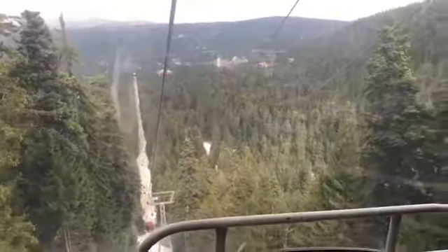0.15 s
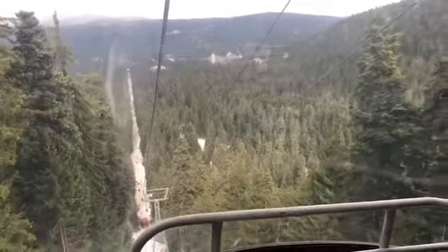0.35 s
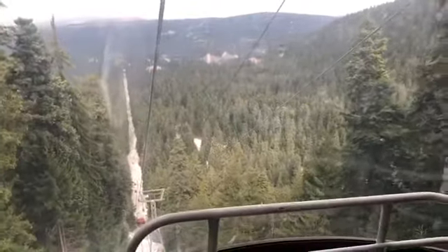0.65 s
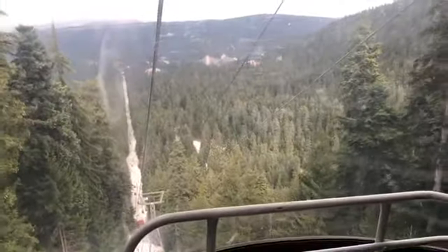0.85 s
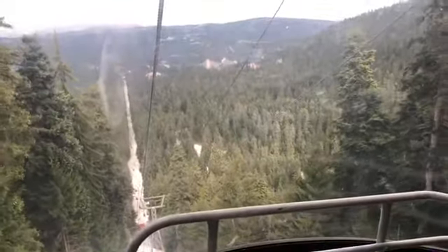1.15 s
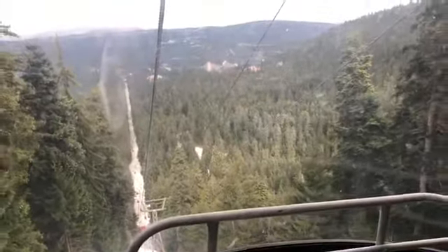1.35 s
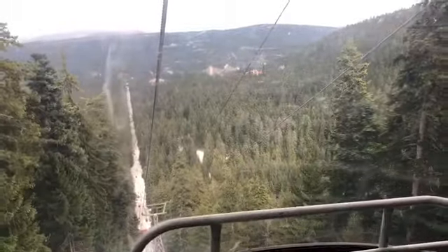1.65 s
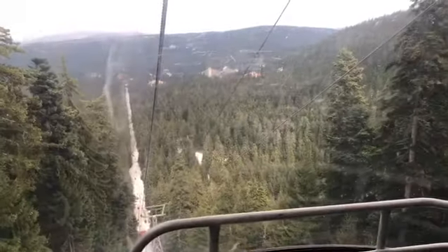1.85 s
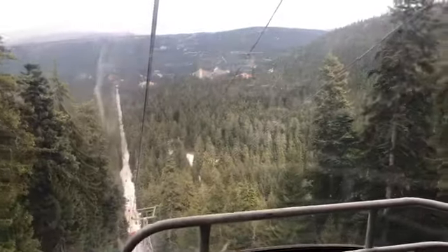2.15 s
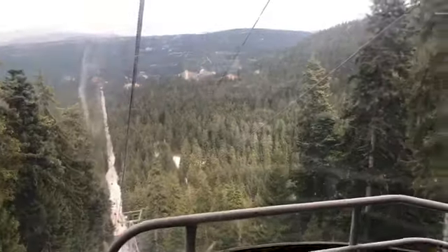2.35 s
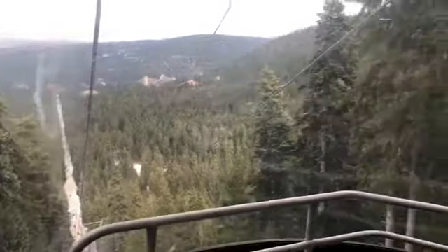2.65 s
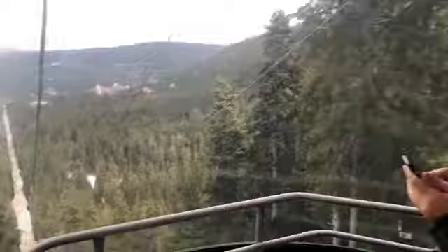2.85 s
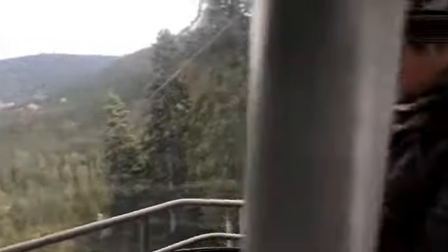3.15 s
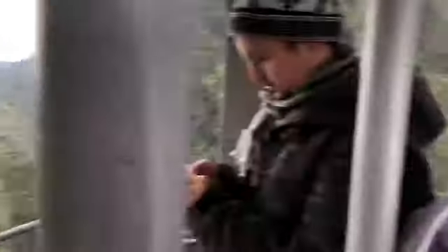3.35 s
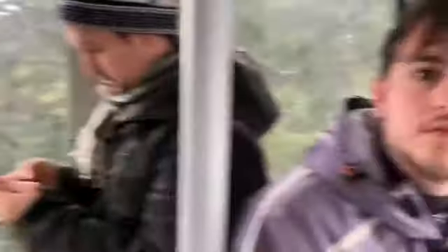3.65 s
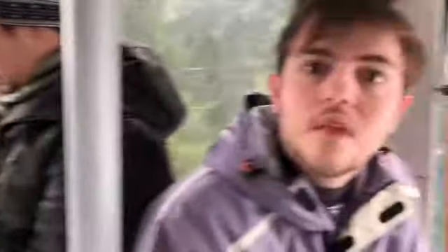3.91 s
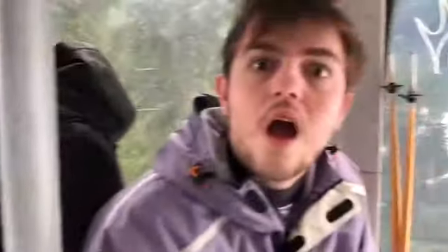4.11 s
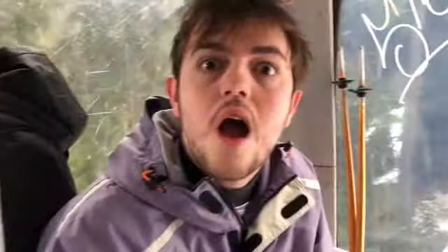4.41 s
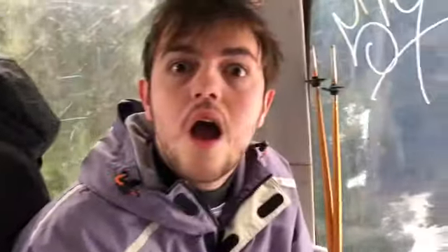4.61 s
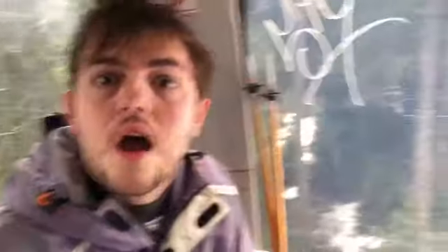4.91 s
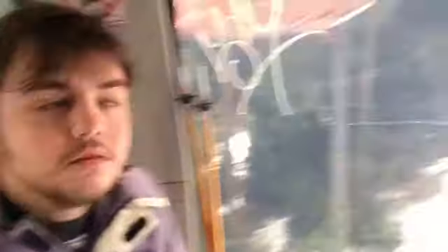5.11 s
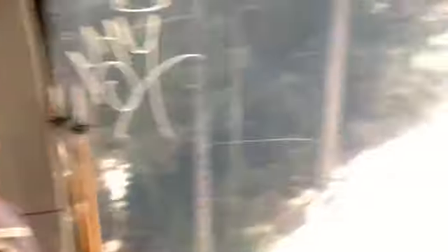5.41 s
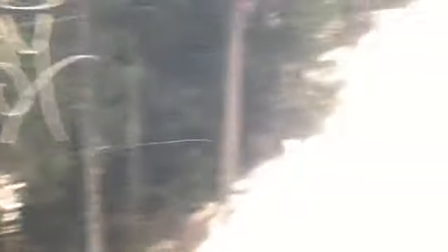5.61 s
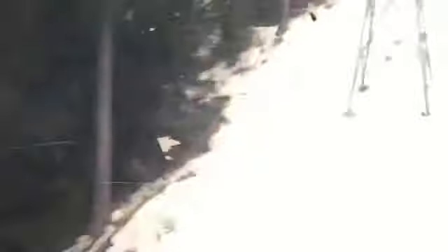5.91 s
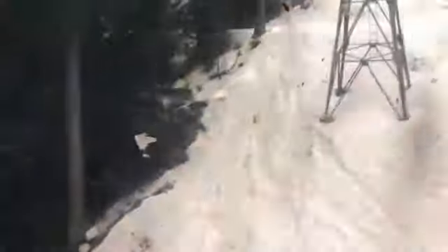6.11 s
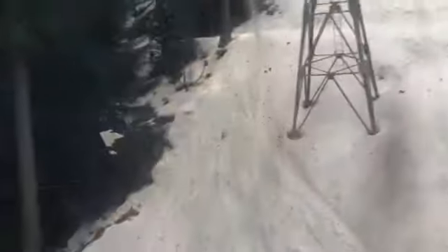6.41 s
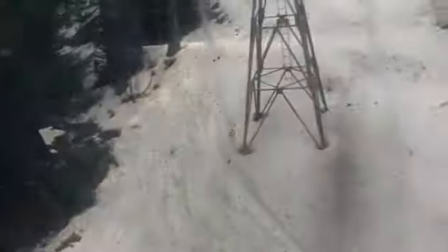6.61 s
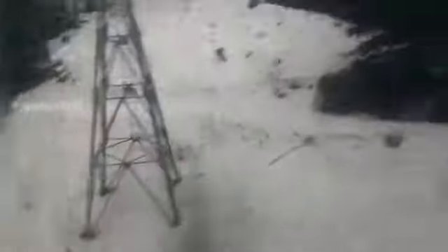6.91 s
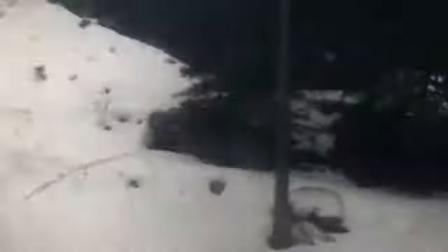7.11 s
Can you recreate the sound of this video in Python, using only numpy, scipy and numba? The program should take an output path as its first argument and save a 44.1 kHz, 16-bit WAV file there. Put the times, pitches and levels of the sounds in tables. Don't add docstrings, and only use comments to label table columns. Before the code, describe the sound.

The inside of a small cable-car cabin in wind, heard close, dry and mono from a handheld phone. Throughout, gusts swell and sink on one deep humming note, with low buffeting, a wavering panel drone and a very thin hiss. A soft sleeve brush passes at 0.3-0.4 s. From 0.7 to 1.9 s loose fittings chatter, with small pings, dry ticks and muffled taps; at about 2 s a fuller, dull knock rings the shell. It is calmer until a low thud at 3.05 s and sparse rattles. From 4.1 to 4.8 s a fitting bounces in quick doubles and a triple. Light rattles continue between 5.2 and 6 s. The boom is strongest around 6.2 s and again at 6.9 s, with a short sharp knock at 6.75 s, a lower triple rattle at 6.9 s, and cloth brushing with singing panels near 7.2 s.

```python
import sys
import numpy as np
from scipy import signal
from scipy.fft import rfft, irfft
from scipy.io import wavfile
from scipy.ndimage import uniform_filter1d
from numba import njit

SR = 44100
rng = np.random.default_rng(int(sys.argv[2]) if len(sys.argv) > 2 else 0)


def field_ratio(decibels):
    return 10 ** (np.asarray(decibels, dtype=float) / 20)


def generate_wav(signal):
    frames = np.transpose(np.atleast_2d(signal))
    scaled = np.clip(frames, -1, 1) * 32767
    pcm = np.round(scaled).astype(np.int16)
    wavfile.write(sys.argv[1], SR, pcm)


N = 320166


def unit(x):
    return x / np.sqrt(np.mean(x ** 2))


@njit
def bandpass(x, hz, width_hz):
    y, band, low = np.empty(len(x)), 0., 0.
    g, k = np.tan(np.pi * hz / SR), width_hz / hz
    for i in range(len(x)):
        v = (band + g * (x[i] - low)) / (1 + g * (g + k))
        band, low, y[i] = 2 * v - band, low + 2 * g * v, k * v
    return y


def ring(x, hz, width_hz):
    narrow = bandpass(x, 1. * hz, 1. * width_hz)
    return unit(bandpass(narrow, 1. * hz, 3. * width_hz))


def lowpass(x, order, cutoff_hz):
    return signal.sosfilt(signal.butter(order, cutoff_hz, fs=SR, output="sos"), x)


def walk(rate_hz):
    hold = int(SR / rate_hz)
    steps = np.repeat(rng.standard_normal(N // hold + 1), hold)
    return 1.3 * uniform_filter1d(uniform_filter1d(steps, hold), hold)[:N]


def coloured(spectrum, flicker_db, rate_hz):
    hz, db = np.transpose(spectrum)
    octave = np.log2(np.maximum(np.arange(N // 2 + 1) * SR / N, 1))
    gain = field_ratio(np.interp(octave, np.log2(hz), db, left=-120, right=-120))
    bins = rfft(rng.standard_normal(N)) * gain
    out = np.zeros(N)
    for centre in range(4, 15):
        region = irfft(bins * np.clip(1 - abs(octave - centre), 0, 1), N)
        out += region * field_ratio(flicker_db * walk(rate_hz))
    return unit(out)


def burst(t60_s, rise_s):
    t = np.arange(int(SR * .3)) / SR
    puff = rng.standard_normal(len(t)) * (1 - np.exp(-t / rise_s)) * np.exp(-np.log(1000) * t / t60_s)
    puff[0] = 5.
    return puff


def add(out, s, x, peak_db):
    i = int(s * SR)
    out[i:i + len(x)] += (x * field_ratio(peak_db) / abs(x).max())[:N - i]


# t/s, wind level/dB, rope vibration level/dB, panel sway level/dB
SHAKE = [(0.0, -36.5, -54.5, -37), (0.51, -43.5, -52.5, -43.5), (0.85, -39.5, -50.5, -42),
         (1.35, -42.5, -58.5, -43.5), (1.95, -42.5, -53, -37), (2.2, -44, -58, -42),
         (2.93, -39, -56.5, -43.5), (3.3, -43.5, -56, -43), (3.66, -47.5, -55, -44.5),
         (4.02, -39, -56, -44), (4.75, -40.5, -60, -46), (5.09, -37, -55, -44.5), (5.46, -40.5, -56, -40.5),
         (5.7, -32.5, -55.5, -45), (6.07, -39, -57.5, -42), (6.55, -42, -57.5, -45), (6.71, -37, -56, -43),
         (7.26, -33.5, -51.5, -41)]


def shake():
    s, *columns = np.transpose(SHAKE)
    return [np.interp(np.arange(N) / SR, s, column) for column in columns]


# f/Hz, level/dB per Hz
HISS = [(1500, -8), (2400, -3.5), (3500, -2.5), (5000, -7), (8000, -14), (12000, -21), (15500, -30.5)]


def air_hiss():
    wind_db, _, _ = shake()
    return field_ratio(-69 + .1 * (wind_db + 40)) * coloured(HISS, flicker_db=.8, rate_hz=16)


# f/Hz, level/dB per Hz
BUFFET = [(16, -36), (25, -7), (33, -3), (45, 1.5), (62, -2.5), (75, -1), (105, -6), (125, -13), (160, -41)]


def wind_buffet():
    wind_db, _, _ = shake()
    buffet_db = wind_db + 5.5 + 1.2 * walk(9)
    return field_ratio(buffet_db + .8) * coloured(BUFFET, flicker_db=.5, rate_hz=4)


# f/Hz, level/dB per Hz
DRONE = [(80, -17.5), (115, 0.5), (150, -4.5), (230, -6), (310, -15.5), (420, -18.5), (600, -32.5)]
# f/Hz, width/Hz, level/dB
PANEL = [(141.7, 4.3, -2.5), (170.9, 6, -3), (190.9, 9.1, -1.5), (214.8, 19, -7), (268, 15, -11.5),
         (364.7, 12, -13.5), (397.2, 31, -21)]


def panel_drone():
    _, _, sway_db = shake()
    drone_db = sway_db - 0.5 + .8 * walk(6)
    push = rng.standard_normal(N)
    modes = unit(sum(field_ratio(db + 0.5 * walk(2.1)) * ring(push, hz, width_hz) for hz, width_hz, db in PANEL))
    broad = coloured(DRONE, flicker_db=1.6, rate_hz=8)
    return field_ratio(drone_db) * (field_ratio(-1.5) * broad + field_ratio(-4) * modes)


# t/s of the top, level/dB, half length/s, f/Hz
GUSTS = [(0.053, -25.5, 0.075, 86.7), (0.131, -23, 0.048, 88.7), (0.294, -28.5, 0.062, 89.65),
         (0.574, -25.0, 0.13, 86.73), (0.767, -29.5, 0.14, 85.5), (0.913, -29, 0.094, 89.2),
         (1.065, -27, 0.15, 88.6), (1.169, -37.5, 0.122, 90.3), (1.274, -28, 0.083, 90.8),
         (1.415, -24.0, 0.1, 86.74), (1.537, -23.5, 0.096, 89.2), (1.64, -26, 0.092, 88.8),
         (1.768, -30.0, 0.14, 87.56), (1.93, -20.5, 0.12, 87.4), (2.044, -23.0, 0.1, 87.5),
         (2.238, -24, 0.12, 90.1), (2.398, -24.0, 0.09, 86.4), (2.616, -34, 0.119, 87.5),
         (2.711, -34, 0.17, 87.2), (2.876, -31.5, 0.19, 87.16), (2.956, -29.5, 0.069, 86.56),
         (3.192, -29.5, 0.19, 85.96), (3.409, -22.0, 0.12, 86.3), (3.519, -38, 0.05, 84.8),
         (3.612, -27.5, 0.161, 85.1), (3.78, -29.5, 0.27, 86.36), (4.087, -20.5, 0.15, 85.8),
         (4.245, -29.0, 0.088, 88.55), (4.364, -23, 0.08, 86.56), (4.461, -28, 0.047, 90.2),
         (4.529, -29.5, 0.09, 89.7), (4.732, -28, 0.09, 88.7), (4.813, -23.5, 0.05, 87.44),
         (4.887, -28, 0.052, 89.6), (4.972, -25, 0.048, 84.7), (5.067, -25, 0.1, 87.67),
         (5.175, -25, 0.088, 87.53), (5.298, -22.5, 0.13, 86.2), (5.531, -20, 0.17, 87.5),
         (5.73, -28, 0.13, 86.4), (5.869, -38.5, 0.22, 86.85), (5.997, -24.0, 0.14, 87.4),
         (6.198, -16.5, 0.091, 87.86), (6.317, -21, 0.077, 84.7), (6.414, -22, 0.05, 87.2),
         (6.506, -21, 0.11, 87.43), (6.625, -22, 0.1, 86.96), (6.889, -18.5, 0.185, 87.9),
         (7.054, -20, 0.065, 89.6), (7.196, -33.5, 0.21, 88)]


def cabin_boom():
    t, (tops_s, _, _, pitch_hz) = np.arange(N) / SR, np.transpose(GUSTS)
    size = field_ratio(-46.5)
    for s, db, half_s, _ in GUSTS:
        size = size + field_ratio(db) * np.cos(np.pi / 2 * np.clip((t - s) / half_s, -1, 1)) ** 2
    waver_hz = 1.108 * walk(15)
    phase = 2 * np.pi * np.cumsum(np.interp(t, tops_s, pitch_hz) + waver_hz) / SR
    note = np.sqrt(2) * np.sin(phase) * field_ratio(0.79 * walk(14))
    octave = field_ratio(-30) * np.sin(2 * phase)
    skirt = ring(rng.standard_normal(N), 85.2, 19)
    return size * (note + octave) + field_ratio(-24) * size ** 0.42 * skirt


# t/s of the top, level/dB, f/Hz, half length/s
SINGING = [(0.2, -51.5, 190, 0.36), (.25, -54.5, 262.6, 0.25), (0.647, -50.5, 262.3, 0.18),
           (1.55, -44, 143.3, 0.22), (1.503, -55.5, 265.6, 0.66), (2.007, -48, 174.5, .12),
           (2.449, -52, 143.3, 0.22), (2.502, -48, 172, 0.16), (3.548, -46, 142.6, .5),
           (3.702, -53.5, 172.8, 0.58), (4.4, -50.5, 172.1, 0.14), (5.156, -44, 172.2, .3),
           (5.116, -42.5, 142.2, 0.18), (5.548, -47, 169.5, 0.46), (6.048, -47.5, 171, 0.42),
           (6.6, -46, 143, 0.17), (7.124, -42, 172.1, .2), (7.154, -41.5, 141.7, .25)]


def panel_singing():
    t = np.arange(N) / SR
    drift = 2 * np.pi * np.cumsum(1.2 * walk(8)) / SR
    notes = np.zeros(N)
    for s, db, hz, half_s in SINGING:
        swell = np.cos(np.pi / 2 * np.clip((t - s) / half_s, -1, 1))
        notes += field_ratio(db) * swell * np.sin(2 * np.pi * hz * t + drift)
    return np.sqrt(2) * field_ratio(2.4 * walk(10)) * notes


# t/s of the top,
# level/dB, f/Hz, width/octaves, half length/s
SWISHES = [(0.36, -55.5, 1720, 3.2, 0.13), (2.57, -67, 4664, .15, 0.058), (2.58, -66, 3700, 1.6, .12),
           (2.5, -70, 4600, 1.6, 0.29), (2.7, -67, 4700, 0.4, 0.09), (3.7, -71, 4000, 2.5, 0.56),
           (6.96, -64, 3300, 1.3, 0.07), (7.23, -55.5, 3300, 1.8, 0.089), (0.86, -74, 4080, .09, .14),
           (7.22, -56.5, 2600, 3.5, 0.2), (7.2, -67.5, 5500, 2.5, 0.15), (6.5, -70.5, 4000, 4.3, 0.32),
           (6.975, -63, 3400, 0.41, .04), (3.76, -55.5, 380, .4, .3), (4.4, -57, 370, .4, .3),
           (5.4, -56, 369, .4, .7), (.22, -62.5, 1900, 2, .06), (1.15, -64, 1400, 1.7, .07),
           (4.47, -62.5, 1330, .4, .12), (4.85, -64, 1330, .4, 0.11), (7.14, -60.5, 4700, 0.27, 0.087),
           (7.22, -59, 2500, 0.62, 0.042), (2.55, -71.5, 7300, .6, .07), (0.41, -59.5, 2200, 1.5, 0.16),
           (0.72, -63.5, 2800, 1.3, .1), (2.9, -72, 4100, 1.5, .1), (7.13, -60.5, 1200, 1.2, 0.062)]


def soft_swells():
    out = np.zeros(N)
    for s, db, hz, octaves, half_s in SWISHES:
        swell = np.exp(-((np.arange(N) / SR - s) / half_s) ** 2)
        noise_band = ring(rng.standard_normal(N), hz, .35 * octaves * hz)
        out += field_ratio(db + 1.6 * walk(35)) * swell * noise_band
    return out


# f/Hz, level/dB per Hz
ROPE = [(300, -18), (450, -1.5), (700, -0.5), (1100, -6), (1700, -12.5), (2400, -16), (3600, -41.5)]
# f/Hz, width/Hz, level/dB
FITTING = [(500, 140, -2), (680, 160, -2), (900, 170, -1), (1120, 150, -3), (1315, 90, -2), (1520, 170, -3),
           (1950, 280, -6), (2400, 330, -7), (3100, 600, -10), (4500, 1800, -13)]


def rope_chatter():
    _, rope_db, _ = shake()
    touches = (rng.random(N) < 60 / SR) * rng.exponential(size=N) ** .4
    force = 0.023 + signal.lfilter([1], [1, -np.exp(-1 / (0.014 * SR))], touches)
    contacts = force * rng.standard_normal(N)
    chatter = np.zeros(N)
    for hz, width_hz, db in FITTING:
        dulled_db = db - 6.7 * max(np.log2(hz / 1500), 0)
        chatter += field_ratio(dulled_db) * ring(contacts, hz, width_hz)
    rope = coloured(ROPE, flicker_db=2.3, rate_hz=7)
    return field_ratio(rope_db - 1.5) * (rope + field_ratio(-6.5) * unit(chatter))


# t/s, peak level/dB, f/Hz, t60/s
PINGS = [(.712, -48, 1499, .12), (.745, -39, 512, 0.1), (.888, -49, 697, 0.055), (.905, -49, 1350, 0.11),
         (.952, -40.5, 504, .15), (1.175, -46, 1320, .2), (1.365, -44.5, 1540, 0.18),
         (1.463, -49.5, 2306, .08), (1.475, -54, 1490, .1), (1.515, -44.5, 864, .05),
         (1.598, -46.5, 1600, 0.067), (1.975, -46.5, 889, 0.043), (1.98, -29.5, 172, .2),
         (1.975, -23.5, 143, .2), (.81, -42, 1600, .04), (3.379, -48, 1309, 0.11), (3.659, -41, 1203, .08),
         (3.804, -47, 1290, .05), (4.523, -46, 1295, 0.14), (4.525, -46, 750, 0.063),
         (4.94, -46.5, 1340, 0.12), (5.215, -46, 944, 0.036), (4.77, -50, 1346, .25),
         (1.985, -38, 238.8, 0.079), (3.148, -48, 1400, 0.063), (4.482, -49, 1350, .15),
         (4.485, -46, 800, .06), (4.731, -50.5, 995, 0.046), (4.806, -47.5, 1340, .15),
         (4.806, -51.5, 2400, .05), (4.905, -50, 1241, .1), (5.453, -43.5, 750, .1),
         (5.515, -42, 631, 0.065), (5.626, -49, 1051, .1), (5.635, -50.5, 2710, 0.19),
         (5.555, -48, 901, .06), (5.85, -48, 950, 0.07), (5.712, -45.5, 895, .06), (5.712, -49, 1340, .15),
         (5.778, -47, 896.6, 0.061), (5.973, -46.5, 852, .1), (6.462, -48, 904, 0.12),
         (6.722, -43, 680, 0.094), (6.821, -47.5, 1003, 0.045), (6.9, -45, 677, .15),
         (6.835, -54, 8135, 0.017)]


def pings():
    out = np.zeros(N)
    for s, db, hz, t60_s in PINGS:
        tone = ring(burst(.8 * t60_s, rise_s=.0003), hz, 2.2 / t60_s + .055 * hz)
        add(out, s, tone, db - 2.5)
        click_hz = max(hz, 600)
        click = ring(burst(.02, rise_s=.0002), click_hz, 1.2 * click_hz)
        add(out, s, click, db - 5 + 12 * min(np.log2(hz / 800), 0))
    return out


# t/s, peak level/dB, f/Hz, t60/s
TICKS = [(0.739, -48, 3870, 0.09), (0.811, -51, 6700, 0.015), (0.812, -41, 1660, 0.014),
         (1.358, -55.5, 1880, 0.23), (0.945, -49.5, 6350, 0.13), (1.587, -49, 3870, 0.14),
         (1.851, -51.5, 4520, 0.18), (1.968, -53.5, 4494, 0.044), (3.8, -54, 2600, 0.035),
         (4.413, -52, 3600, 0.025), (4.482, -54, 3600, 0.031), (4.523, -58.5, 3800, .03),
         (4.806, -51, 3800, 0.042), (4.94, -56.5, 3781, 0.031), (3.908, -54, 3990, 0.13),
         (3.929, -54.5, 10670, 0.044), (5.13, -52.5, 8270, 0.01), (5.63, -51, 2654, 0.11),
         (5.709, -52, 3915, 0.029), (5.798, -52, 3925, 0.021), (6.714, -54.5, 5018, 0.11),
         (6.835, -51, 8205, 0.011), (6.835, -57, 13500, .01), (6.72, -46.5, 1505, 0.14),
         (6.835, -42.5, 4542, 0.006)]


def ticks():
    out = np.zeros(N)
    for s, db, hz, t60_s in TICKS:
        add(out, s, ring(burst(t60_s, rise_s=.0004 + .02 * t60_s), hz, .7 * hz), db)
    return out


# t/s, peak level/dB, low f/Hz, high f/Hz, t60/s
KNOCKS = [(0.571, -36.5, 247, 488, 0.15), (0.751, -36.5, 264, 516, 0.07), (.888, -42, 475, 760, 0.061),
          (1.515, -41, 604, 800, 0.027), (.955, -35.5, 289, 510, 0.11), (1.775, -31.5, 220, 472, 0.064),
          (1.979, -26, 320, 365, 0.1), (3.05, -32.5, 183, 236, 0.13), (3.659, -41, 1600, 2300, 0.03),
          (3.659, -40, 950, 1600, .07), (5.215, -42, 900, 1700, .025), (1.358, -44, 1250, 1950, .06),
          (1.588, -48, 2900, 4000, .06), (1.597, -46, 1600, 4100, .07), (5.626, -48, 2700, 3200, .15),
          (5.7, -56, 3900, 4600, .1), (1.85, -46, 1900, 2800, .08), (.947, -48, 2900, 4000, .12),
          (1.12, -36, 230, 290, .15), (1.43, -34, 220, 270, .15), (.86, -36, 240, 300, .12),
          (2.56, -38, 210, 260, .12), (5.08, -34, 150, 175, .2), (4.806, -43, 900, 1400, .04),
          (4.413, -47, 900, 1350, .04), (3.804, -46, 2000, 2900, 0.03), (6.746, -37, 1200, 1900, 0.01),
          (6.747, -29, 401, 791, 0.0099), (6.75, -36.5, 600, 1528, .008)]


def knocks():
    out = np.zeros(N)
    for s, db, low_hz, high_hz, t60_s in KNOCKS:
        blow = burst(t60_s / 4, rise_s=0.00037)
        thud = sum(ring(blow, hz, 3.4 / t60_s + 0.052 * hz) for hz in (low_hz, high_hz))
        add(out, s, lowpass(thud, 4, 1.4 * high_hz), db)
    return out


# first t/s, last t/s, last peak level/dB, f/Hz
BOUNCES = [
    (1.15, 1.18, -45.5, 1320),
    (4.094, 4.124, -47.5, 1320),
    (4.377, 4.413, -41.5, 1320),
    (4.451, 4.482, -45, 1269),
    (4.522, 4.522, -44.5, 1308),
    (4.732, 4.806, -42.5, 1290),
    (6.904, 6.974, -38.5, 899.2),
]


def bounces():
    rows = []
    for first_s, last_s, db, hz in BOUNCES:
        times = np.linspace(last_s, first_s, round((last_s - first_s) / .035) + 1)
        rows += [(s, db - 2.5 * k, hz, -7) for k, s in enumerate(times)]
    return rows


# t/s, peak level/dB, struck part f/Hz, brightness/(dB per octave)
RATTLES = [(0.238, -45, 923, -3), (0.709, -41.5, 1221, -5), (0.808, -48, 1531, -1), (0.885, -55, 869, 4),
           (0.946, -37, 1010, 0), (0.91, -57, 1305, 4.5), (1.357, -43.5, 1900, -16),
           (1.463, -40, 1050, -11), (1.516, -50, 868, -2), (1.585, -44, 1640, -3.5), (1.707, -70, 1324, -9),
           (1.848, -40.5, 1147, 0), (1.91, -42.5, 964, -4), (1.973, -41.5, 883, -2),
           (2.415, -48.5, 1190, 0.5), (3.147, -45.5, 1471, -8), (3.378, -47, 1000, -9),
           (3.463, -47.5, 1501, -7), (3.803, -45, 1270, -4), (3.912, -44, 854, 2), (4.593, -56, 1300, -12),
           (5.277, -49.5, 860, 2.5), (5.459, -46, 1131, -5), (5.557, -46.5, 885.3, -7.5),
           (5.624, -41, 1110, -9.5), (5.711, -41, 1310, -8), (5.973, -49, 1330, -8),
           (6.462, -46, 904, -16.5), (6.703, -39, 900, -5), (6.821, -44, 900, -3), (3.584, -45, 1150, -5),
           (3.55, -50, 1200, -6), (3.622, -48.5, 1104, -7), (3.826, -53, 1200, -8),
           (4.045, -48.5, 1100, -6), (5.178, -45.5, 1350, -12), (5.49, -47, 1200, -7.5),
           (5.587, -44.5, 1300, -9), (5.778, -51, 1100, -10), (4.903, -52, 1319, -13),
           (4.94, -46, 1300, -11), (0.405, -47.5, 1700, -11), (7.13, -45, 1300, -8),
           (1.765, -50.5, 1201, 0), (3.3, -46, 1400, -9), (3.335, -45, 1400, -9), (2.15, -47, 1300, -10),
           (5.452, -44.5, 800, -9)]


def rattles():
    out = np.zeros(N)
    for s, db, part_hz, bright_db in list(RATTLES) + bounces():
        t60_s = max(.09 + .004 * (db + 47.5), .05)
        blow, scatter = burst(t60_s, rise_s=.0007), rng.standard_normal(len(FITTING))
        sound = ring(burst(t60_s / 2, rise_s=.0004), 1400, 1500) * field_ratio(-4 + .3 * bright_db)
        for (hz, width_hz, mode_db), c in zip(FITTING, scatter):
            tilt_db = bright_db * max(np.log2(hz / 1500), 0)
            near_db = 4.5 * np.exp(-(2.5 * np.log2(hz / part_hz)) ** 2)
            mode = ring(blow, hz, (2.4 + .1 * min(bright_db, 0)) * width_hz)
            sound += field_ratio(mode_db + tilt_db + 1.5 * c + near_db) * mode
        cutoff_hz = np.clip(9000 * field_ratio(1.8 * bright_db), 2000, 15000)
        add(out, s, lowpass(sound, 2, cutoff_hz), db - 1)
        snap = ring(burst(.04, rise_s=.0003), 1900, 0.59 * 1900)
        add(out, s, lowpass(snap, 4, 5200), db - 9.5)
    return out


def scene():
    background = air_hiss() + wind_buffet() + panel_drone() + cabin_boom() + panel_singing()
    foreground = soft_swells() + rope_chatter() + pings() + ticks() + knocks() + rattles()
    return (background + foreground)[None]


def band_limit(x):
    return signal.sosfilt(signal.butter(12, 15740, fs=SR, output="sos"), x)


def record(dry):
    return band_limit(dry)


dry = scene()
out = record(dry)
generate_wav(out)
```